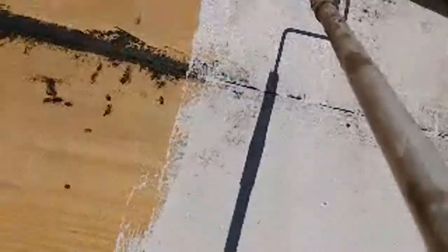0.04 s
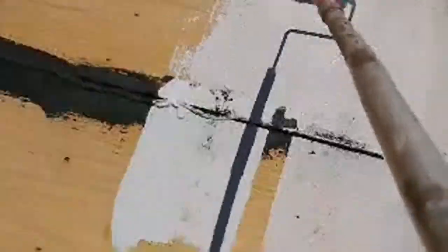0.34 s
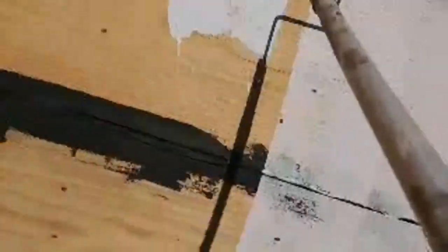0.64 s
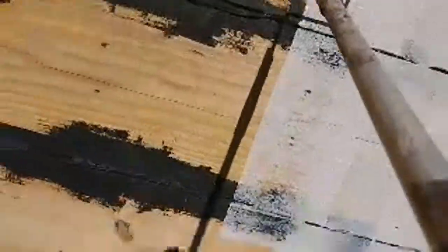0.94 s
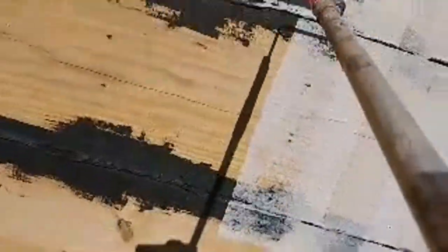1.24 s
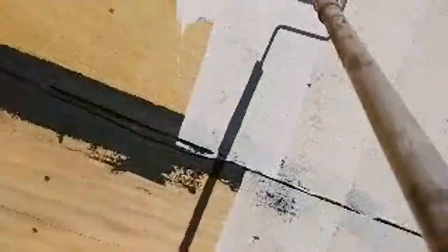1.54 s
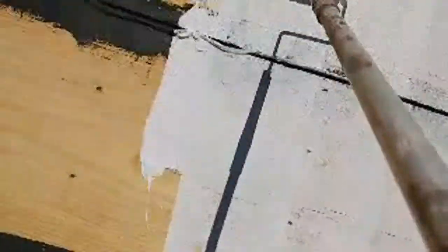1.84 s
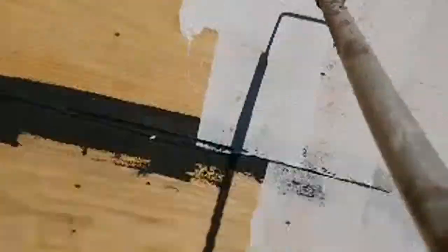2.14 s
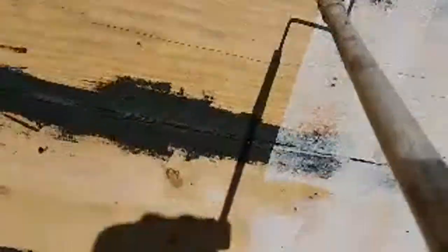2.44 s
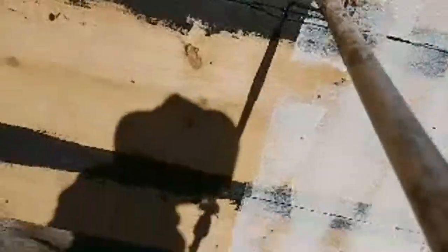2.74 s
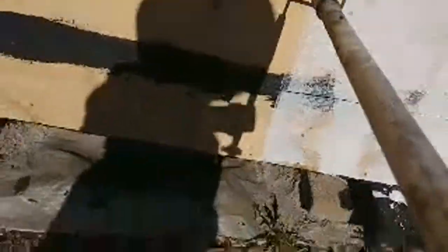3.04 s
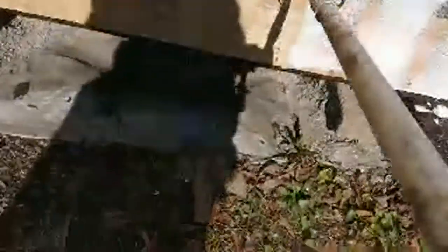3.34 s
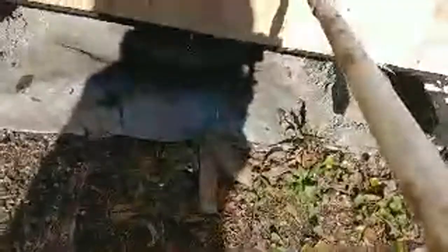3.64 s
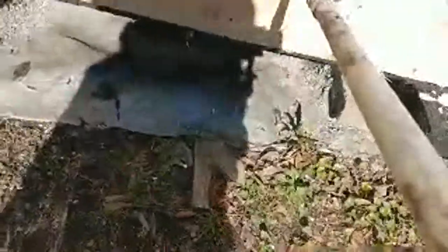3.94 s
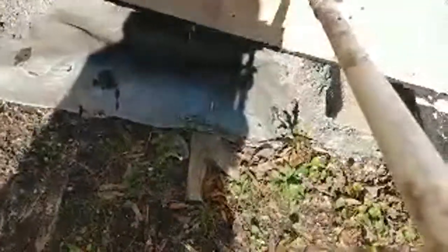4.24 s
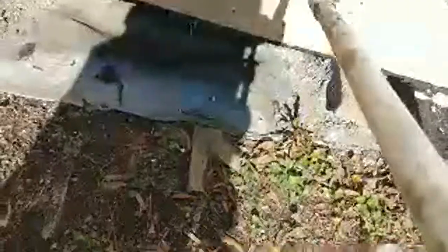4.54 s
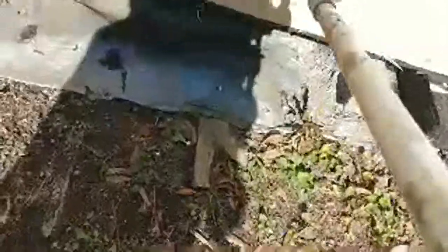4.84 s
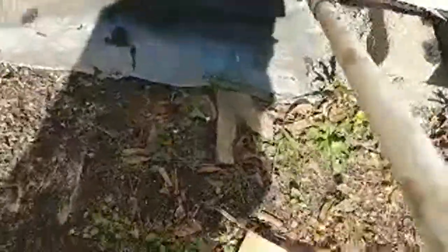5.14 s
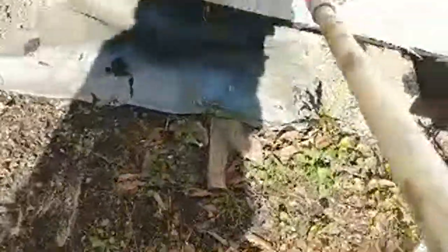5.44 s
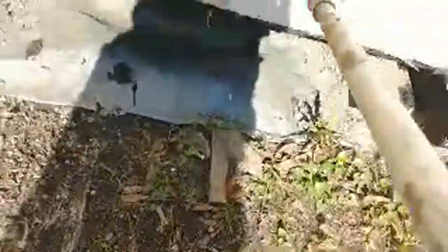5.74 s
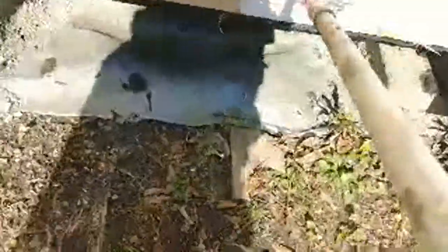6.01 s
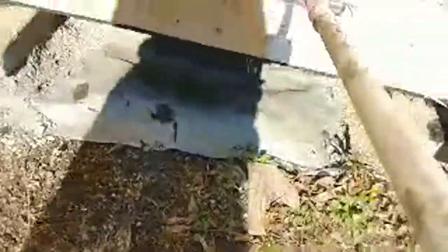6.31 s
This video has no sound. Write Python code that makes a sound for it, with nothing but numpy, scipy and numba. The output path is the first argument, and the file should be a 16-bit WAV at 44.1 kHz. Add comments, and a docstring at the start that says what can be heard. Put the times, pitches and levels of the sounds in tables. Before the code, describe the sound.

Tacky paint hisses and crackles under a roller pushed back and forth over plywood, with small squelches and a low drumming from the wood. A sharp clunk ends the long strokes, leaving a lull with light pole rattles and thin, faint squeaks. The rolling resumes in shorter, slower passes with a few more knocks. Everything is heard close up in a quiet outdoor space with almost no echo.

```python
"""Outdoors on a plywood roof, a paint roller on a long pole spreads thick coating close by.
Threads of tacky paint rupture behind the nap in a dense hiss, wet patches squelch and spurt,
and the sheets drum in forced vibration. The roller knocks over seams, clunks off the edge and is
lifted, its pole rattling and its axle squeaking faintly; then it works in short, slow strokes."""
import sys
import numpy as np
from scipy import signal
from scipy.fft import rfft, irfft
from scipy.io import wavfile
from scipy.ndimage import uniform_filter1d
from numba import njit

SR = 44100
rng = np.random.default_rng(int(sys.argv[2]) if len(sys.argv) > 2 else 0)


def log_audio(samples):
    """Write samples as a 16-bit WAV file to the path given in sys.argv[1]."""
    # one column per channel
    frames = np.atleast_2d(samples).T
    # limit to full scale, then quantise
    limited = np.clip(frames, -1, 1)
    pcm = np.round(limited * 32767).astype(np.int16)
    wavfile.write(sys.argv[1], SR, pcm)


N = 289737
T = np.arange(N) / SR
RING = T[:SR // 2]  # time axis of one short event, in seconds


def undb(db):
    """Decibels to amplitude ratio."""
    return 10 ** (np.asarray(db) / 20)


def unit(x):
    """Normalise to a standard deviation of 1."""
    return x / np.std(x)


def colour(x, points):
    """Minimum-phase filter through (Hz, dB) points, made by folding the cepstrum of its gain."""
    hz, db = np.transpose(points)
    size = 4096
    f = np.maximum(np.fft.rfftfreq(size, 1 / SR), 1)
    cepstrum = irfft(np.log(undb(np.interp(np.log(f), np.log(hz), db))))
    cepstrum[1:size // 2] *= 2
    cepstrum[size // 2:] = 0
    return signal.fftconvolve(x, irfft(np.exp(rfft(cepstrum))))[:len(x)]


@njit
def svf(x, hz, damping):
    """Damped resonator with a moving centre (state-variable filter): returns band-pass and high-pass."""
    y, band_state, low_state = np.empty((2, len(x))), 0., 0.
    for i in range(len(x)):
        g = np.tan(np.pi * min(hz[i], .45 * SR) / SR)
        band = (band_state + g * (x[i] - low_state)) / (1 + g * (g + damping))
        y[0, i] = damping * band
        y[1, i] = x[i] - damping * band - low_state - g * band
        band_state, low_state = 2 * band - band_state, low_state + 2 * g * band
    return y


def walk(rate):
    """Slow random modulation of unit spread: rate values a second, smoothed twice."""
    hold = max(int(SR / rate), 1)
    steps = rng.standard_normal(N)[np.arange(N) // hold]
    return unit(uniform_filter1d(uniform_filter1d(steps, hold), hold))


def snaps(rate, spread_db):
    """Shot noise of unit power: rate random impulses a second, of uneven size."""
    chance = np.clip(rate / SR, 0, 1)
    sizes = undb(spread_db * np.minimum(rng.standard_normal(N), 2)) * np.sign(rng.standard_normal(N))
    return unit((rng.random(N) < chance) * sizes)


def fall(t60):
    """Exponential decay, 60 dB in t60 seconds."""
    return np.exp(-np.log(1000) * RING / t60)


def onset(tau):
    """Exponential rise to 1 with a time constant of tau seconds."""
    return 1 - np.exp(-RING / tau)


def add(out, s, x, db):
    """Superpose a sound at s seconds with its peak at db."""
    i = max(int(s * SR), 0)
    out[i:i + len(x)] += (undb(db) * x / np.abs(x).max())[:N - i]


def movements(rise_oct=0.76, sheet_t60=0.2, soaked_db=-59):
    """Strokes and light handling of the pole add in power: hiss dB, rumble dB and the hiss's edge Hz."""
    # Each row: start, length, speeding up and slowing down in seconds, base levels of hiss and rumble
    # in dB, easing of the motion in dB per second, base lower edge of the hiss in Hz.
    gestures = [(-0.1, 0.19, 0.05, 0.098, -46.5, -52.5, -0.5, 1280),
                (0.035, 0.24, 0.02, 0.013, -72, -72, 17.5, 2150),
                (0.107, 1.118, 0.19, 0.18, -45, -43.5, 5, 1163),
                (1.2, 0.776, 0.12, 0.14, -48, -51, 1, 1269),
                (1.933, 0.643, 0.27, 0.086, -43.5, -40.5, 4.5, 1230),
                (2.555, 0.48, 0.018, 0.14, -50, -47.5, 0.5, 1445),
                (2.946, 0.63, 0.0073, 0.12, -44.5, -43.5, 7.5, 1258),
                (3.48, 0.25, 0.023, 0.11, -62.5, -45, 80.5, 1400),
                (3.921, 0.15, 0.02, 0.15, -60, -47.5, 29, 1630),
                (4.101, 0.4, 0.1, 0.056, -81, -84, 4.5, 2273),
                (4.322, 0.33, 0.05, 0.13, -82.5, -64, 69.5, 2500),
                (4.902, 0.19, 0.015, 0.1, -55.5, -47.5, 51.5, 1295),
                (4.953, 0.32, 0.14, 0.11, -52, -51.5, 1.5, 2035),
                (5.246, 0.21, 0.1, 0.037, -50.5, -51, 6.5, 1952),
                (5.444, 0.23, 0.15, 0.12, -45.5, -42.5, 7, 1385),
                (5.648, 0.26, 0.07, 0.07, -47.5, -45, 6, 1420),
                (5.853, 0.28, 0.078, 0.2, -54, -48.5, 12, 1950),
                (6.081, 0.23, 0.02, 0.033, -74, -68, 16.5, 2500),
                (6.36, 0.12, 0.0039, 0.06, -49, -47, 70, 1900),
                (6.409, 0.3, 0.16, 0.05, -46, -46, -2, 1400)]
    hiss, rumble, weighted_edge = np.full((3, N), 1e-12)
    for s, length, attack, release, hiss_db, rumble_db, easing, edge_hz in gestures:
        rise, stop = np.clip([(T - s) / attack, (s + length - T) / release], 0, 1)
        motion = rise * np.sin(np.pi / 2 * stop) ** 2 * undb(-easing * np.clip(T - s, 0, length))
        power = (undb(hiss_db) * motion) ** 2
        hiss += power
        # at a crawl the threads are short, so the edge lies higher
        weighted_edge += power * edge_hz * 2 ** (rise_oct * (1 - motion))
        rumble += (undb(rumble_db) * motion ** 1.33) ** 2
    retained = np.exp(-2 * np.log(1000) / (sheet_t60 * SR))  # the rumble dies away gradually
    rumble = signal.lfilter([1 - retained], [1, -retained], rumble)
    # a soaked nap hisses louder and lower, and rumbles harder
    wet = np.minimum(puddles()[0] / undb(soaked_db), 1)
    edge_hz = np.maximum(weighted_edge / hiss, 500) * 2 ** (-0.29 * wet)
    return 10 * np.log10(hiss) + 2.5 * wet, 10 * np.log10(rumble) + 6.0 * wet, edge_hz


def puddles(attack_s=0.02, film_hz=690):
    """Thick paint wells up and is rolled out in exponential decay: squelch amplitude and bubble Hz."""
    # Each row: start in seconds, base level in dB, 60 dB decay time in seconds, bubble pitch in Hz.
    wet_patches = [(-0.03, -61.5, 0.52, 692), (0.32, -56.5, 2.4, 764), (0.65, -50, 0.12, 515),
                   (1.196, -51, 0.26, 470), (1.431, -59.5, 0.35, 940), (1.628, -50.5, 0.86, 1029),
                   (1.89, -60, 1.6, 454), (2.123, -59, 1.3, 780), (2.96, -68.5, 2.7, 680),
                   (3.14, -51, 0.3, 674), (3.444, -52.5, 0.34, 629), (4.915, -59, 0.35, 674),
                   (5.68, -54.5, 0.11, 580), (5.82, -53.5, 0.35, 807), (6.37, -50, 0.23, 640)]
    film = 1e-4  # weight of the thin film in the mean pitch
    total, weighted_hz = np.zeros(N), np.full(N, film * film_hz)
    for s, db, t60, hz in wet_patches:
        age = np.maximum(T - s, 0)
        squelch = undb(db) * np.minimum(age / attack_s, 1) * np.exp(-np.log(1000) * age / t60)
        total += squelch
        weighted_hz += squelch * hz
    return total, weighted_hz / (film + total)


def peeling(db, edge_hz):
    """Rupturing paint threads make shot noise in clumps: many fine ones fizz, fewer coarse ones crackle."""
    # Spectrum of the snapping threads. Each row: frequency in Hz, gain in dB.
    thread_spectrum = [(800, -4.5), (1500, -4.5), (2800, -3), (4000, -2.5), (5500, -2.5), (6500, -1),
                       (7600, -4), (8200, 3.5), (10500, 5), (13000, 0.5)]
    # Resonances of the gap between nap and roof. Each row: multiple of the edge frequency, gain in dB.
    gap_modes = [(1.15, -7), (2.1, -5), (3.0, -7)]
    fine = snaps(30000, spread_db=4.0) * undb(1.53 * walk(70))
    coarse = snaps(2600, spread_db=6.5) * undb(6.0 * walk(70))
    # only fast rolling pulls coarse threads
    coarse = unit(svf(coarse, 1.9 * edge_hz, 1.3)[0]) * undb(.4 * (db - db.max()))
    threads = colour(fine + undb(-6.5) * coarse, thread_spectrum)
    gap = np.zeros(N)
    for multiple, gap_db in gap_modes:
        gain = undb(gap_db + 4 * walk(22))
        gap += gain * svf(threads, multiple * edge_hz * np.exp(.07 * walk(14)), .12)[0]
    threads = threads + gap
    # comb filtering: the roof reflects the hiss with a lag that wanders as the pole sways
    lag_s = .0022 * np.exp(0.07 * walk(8.5))
    threads = threads + undb(-12.5) * np.interp(T - lag_s, T, threads)
    for _ in range(4):
        threads = svf(threads, 0.9 * edge_hz, 0.93)[1]
    return unit(threads) * undb(db + 1.0 + 0.15 * walk(220))


def rumbling(rumble_db, flutter_hz=174):
    """Forced vibration: the lumpy nap shakes the plywood; the lifted pole rumbles faintly in the hands."""
    # Spectrum of the rumble. Each row: frequency in Hz, gain in dB.
    rumble_spectrum = [(30, -47.5), (50, -18.5), (72, -8), (105, 4.5), (150, -3), (195, -5), (250, -10.5),
                       (320, -14.5), (420, -25.5), (600, -35.5), (1200, -84)]
    rumble = unit(colour(snaps(460, spread_db=-0.5), rumble_spectrum)) * undb(2.21 * walk(35))
    flutter = snaps(85, spread_db=-2.0)
    sheet_hz = flutter_hz * np.exp(0.12 * walk(17))
    for _ in range(3):
        flutter = svf(flutter, sheet_hz, .42)[0]
    # a light stroke mostly rumbles; the lumps set the sheet fluttering as the pressure grows
    share = np.clip(.75 + .04 * (rumble_db - rumble_db.max()), .08, .9)
    vibration = np.sqrt(1 - share) * rumble + np.sqrt(share) * unit(flutter)
    return vibration * undb(rumble_db + 0.5)


def squelching(rumble_db, film_db=-34):
    """Bubble resonance: squeezed paint pops in the puddles and, faintly, in the film between them."""
    squelch, bubble_hz = puddles()
    bubbles = snaps(900, spread_db=3)
    wobble = np.exp(.13 * walk(70))
    for _ in range(2):
        bubbles = svf(bubbles, bubble_hz * wobble, 1.0)[0]
    return unit(bubbles) * np.hypot(squelch * undb(-1), undb(rumble_db + film_db))


def air(level_db=-76.5):
    """Ambient noise: quiet, broadband outdoor air whose level wavers slightly."""
    # Each row: frequency in Hz, relative spectral level in dB.
    air_spectrum = [(25, -17), (60, -6), (105, 2.5), (170, -19), (400, -14), (1000, -23.5), (3000, -23.5),
                    (7000, -33.5), (10000, -27.5), (15500, -33.5)]
    return unit(colour(rng.standard_normal(N), air_spectrum)) * undb(level_db + 1.1 * walk(6.6))


def smacks(peel_db, count=170):
    """Thicker blobs let go, each a damped oscillation of rising pitch whose level follows the peeling."""
    out = np.zeros(N)
    for when, pitch, size in rng.random((count, 3)):
        s, hz = when * T[-1], 1600 * 3.4 ** pitch
        chirp = np.sin(2 * np.pi * hz * RING * (1 + 12 * RING))
        above_hiss_db = 2 + 2 * min(-np.log(1 - size), 3)
        add(out, s, chirp * fall(12 / hz) * onset(1 / hz) ** 2, peel_db[int(s * SR)] + above_hiss_db)
    return out


def bumps(swell_s=0.0048):
    """Damped free vibration: the sheet swings a few times under each bump of the roller."""
    # Each row: start in seconds, peak level in dB, pitch in Hz.
    thuds = [(0.213, -39, 228), (0.303, -30.5, 145), (0.331, -30, 192), (0.554, -30.5, 183),
             (1.454, -28.5, 192), (1.67, -28, 165), (2.312, -27.5, 191), (2.418, -28, 144),
             (2.596, -32, 180), (2.798, -33, 177), (2.99, -27, 189), (3.451, -35.5, 212),
             (3.474, -29.5, 109.6), (3.923, -32.5, 197), (4.912, -30, 188), (5.819, -31, 105),
             (5.9, -36, 149), (6.375, -32.5, 104), (6.525, -36, 172)]
    out = np.zeros(N)
    swing = (RING / swell_s) ** 2 * np.exp(-1.5 * RING / swell_s)
    for s, db, hz in thuds:
        add(out, s, swing * np.sin(2 * np.pi * hz * RING), db)
    return out


def knocks_and_spurts(tone_t60=0.015, body_t60=0.013):
    """Impulsive excitation: roller knocks and wet spurts of bursting paint crack and ring briefly."""
    # Each row: start in seconds, peak level of the ring in dB, pitch in Hz, peak level of the crack
    # in dB, 60 dB decay time of the crack in seconds.
    transients = [(0.386, -28, 625, -20.5, 0.0065), (0.477, -35.5, 1830, -33, 0.029),
                  (0.655, -38, 1500, -30.5, 0.017), (1.1968, -19.5, 1311, -36, 0.007),
                  (1.228, -57, 1080, -35.5, 0.018), (1.728, -29, 2610, -26.5, 0.035),
                  (2.584, -42, 2120, -29.5, 0.012), (2.957, -38.5, 1670, -31.5, 0.015),
                  (3.044, -37, 1900, -29, 0.055), (3.169, -24.5, 1350, -42, 0.008),
                  (3.456, -23.5, 462, -19, 0.014), (3.466, -20, 378, -12.5, 0.007),
                  (3.4769, -15.5, 385.4, -10, 0.009), (3.4901, -21, 382, -35.5, 0.008),
                  (3.52, -34.5, 1320, -62, 0.008), (4.917, -26.5, 1465, -57, 0.015),
                  (5.821, -32, 353, -25.5, 0.02), (5.841, -31.5, 756, -24.5, 0.012),
                  (6.372, -43, 413, -25, 0.02)]
    # Spectrum of the bright crack. Each row: frequency in Hz, gain in dB.
    crack_spectrum = [(300, 9.5), (1500, -5), (3800, 2.5), (5200, 1), (6500, 0.5), (8000, -0.5), (11000, 1),
                      (16000, -2)]
    out = np.zeros(N)
    for s, db, hz, crack_db, crack_t60 in transients:
        body_noise, grit = rng.standard_normal((2, len(RING)))
        tone = np.sin(2 * np.pi * hz * RING) * fall(tone_t60)
        body = unit(svf(body_noise, np.full(len(RING), float(hz)), 0.21)[0])
        body *= fall(body_t60) + undb(-27) * fall(0.063)
        add(out, s, (tone + undb(-5.5) * body) * onset(0.00041), db)
        crack = grit * (fall(crack_t60) + undb(-30) * fall(0.06)) * onset(crack_t60 / 5)
        add(out, s, colour(crack, crack_spectrum), crack_db)
    return out


def rattles(scrape_db=-4, halving_db=6.5):
    """Modal vibration: the loose joint strikes, chatters and rings the pole, never twice quite alike."""
    # Each row: start in seconds, peak level in dB.
    strikes = [(1.195, -33), (3.822, -48), (3.923, -38), (4.262, -70), (4.347, -60), (4.453, -58),
               (4.596, -29.5), (4.619, -41), (4.653, -53), (4.691, -54.5), (4.749, -63.5), (4.81, -65.5),
               (4.908, -48.5), (4.914, -32), (5.885, -39.5), (6.124, -56), (6.168, -53.5), (6.224, -42),
               (6.264, -61.5), (6.374, -35.5), (6.527, -41)]
    # Each row: frequency in Hz, relative level in dB, 60 dB decay time in seconds.
    pole_modes = [(266, -3, 0.089), (425, -9.5, 0.032), (877, -9, 0.081), (1435, -13, 0.16),
                  (1850, 5.5, 0.081), (1950, 7.5, 0.025), (2780, -6.5, 0.022), (3040, 8.5, 0.045),
                  (2920, 11.5, 0.025), (3617, 8.5, 0.05), (3285, -10, 0.02), (4620, -8, 0.09)]
    scrape_spectrum = [(150, -8.5), (1200, -16), (2700, 14.5), (4200, -13.5), (4900, 10),
                       (5600, -55), (15000, -20.5)]
    out = np.zeros(N)
    for s, db in strikes:
        # a harder strike seats the joint sooner
        chatter_t60 = min(0.081 * 2 ** ((-46.5 - db) / halving_db), 0.16)
        detunings = 1 + .012 * rng.standard_normal(len(pole_modes))
        ring = sum(undb(mode_db) * fall(t60) * np.sin(2 * np.pi * hz * detune * RING)
                   for (hz, mode_db, t60), detune in zip(pole_modes, detunings))
        chatter = rng.standard_normal(len(RING)) * fall(chatter_t60) * onset(0.0013) ** 2
        pole = unit(signal.fftconvolve(chatter, ring)[:len(RING)])
        scrape = unit(colour(chatter, scrape_spectrum))
        add(out, s, pole + undb(scrape_db) * scrape, db)
    return out


def pole_hum():
    """Free vibration: the lifted pole hums in one low, decaying mode."""
    # Each row: start in seconds, peak level in dB, pitch in Hz, 60 dB decay time in seconds.
    hums = [(3.825, -45.5, 211.7, 0.21)]
    out = np.zeros(N)
    for s, db, hz, t60 in hums:
        add(out, s, fall(t60) * onset(0.018) * np.sin(2 * np.pi * hz * RING), db)
    return out


def axle():
    """Stick-slip friction: the lifted roller spins on its dry axle in thin, broken, gliding squeaks."""
    # Each row: start and length in seconds, first and last pitch in Hz, peak level in dB.
    squeaks = [(4.079, 0.42, 3490, 3460, -58.5), (4.148, 0.04, 9500, 9620, -71),
               (4.18, 0.068, 11500, 11840, -67.5), (4.296, 0.139, 11600, 11500, -63.5),
               (4.203, 0.055, 780, 720, -67.5), (4.233, 0.078, 9800, 10660, -67),
               (4.358, 0.089, 9800, 9450, -65.5), (4.472, 0.07, 810, 725, -70.5),
               (4.802, 0.078, 2740, 2580, -60.5), (6.12, 0.17, 10500, 11700, -61.5),
               (6.3, 0.063, 4550, 4370, -66.5)]
    out = np.zeros(N)
    for s, length, first_hz, last_hz, db in squeaks:
        span = (T >= s) & (T < s + length)
        progress = np.linspace(0, 1, span.sum())
        catch = undb(5 * walk(90))[span]
        waver = np.exp(.016 * walk(25))[span]
        hz = (first_hz + (last_hz - first_hz) * progress) * waver
        squeak = rng.standard_normal(N)[span] * catch
        for _ in range(2):
            squeak = svf(squeak, hz, .045)[0]
        add(out, s, squeak * np.sqrt(progress * (1 - progress)), db)
    return out


def scene():
    """Superposition of the roller's direct sound, its weak scattering from the yard, and outdoor air."""
    peel_db, rumble_db, edge_hz = movements()
    direct = peeling(peel_db, edge_hz) + smacks(peel_db) + rumbling(rumble_db) + squelching(rumble_db)
    direct += bumps() + knocks_and_spurts() + rattles() + pole_hum() + axle()
    echoes = rng.standard_normal(len(RING)) * fall(0.18) * onset(.02)
    yard = colour(echoes, [(100, 2.5), (1500, 10), (5000, -26), (15000, -21.5)])
    scatter = signal.fftconvolve(direct, yard / np.linalg.norm(yard))[:N]
    return np.tile(direct + undb(-29) * scatter + air(), (2, 1))


def record(dry, low_hz=50, top_hz=15850):
    """Band limiting: the deep bass is rolled off and the highest treble is cut steeply."""
    dry = signal.sosfilt(signal.butter(4, low_hz, "high", fs=SR, output="sos"), dry)
    return signal.sosfilt(signal.ellip(10, .2, 70, top_hz, fs=SR, output="sos"), dry)


dry = scene()
out = record(dry)
log_audio(out)
```